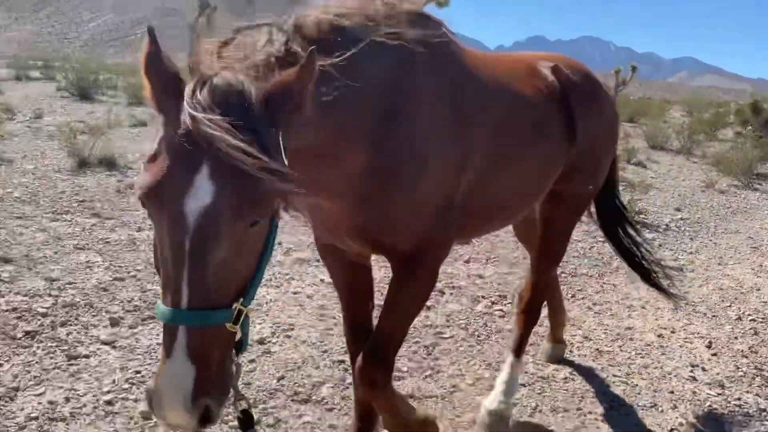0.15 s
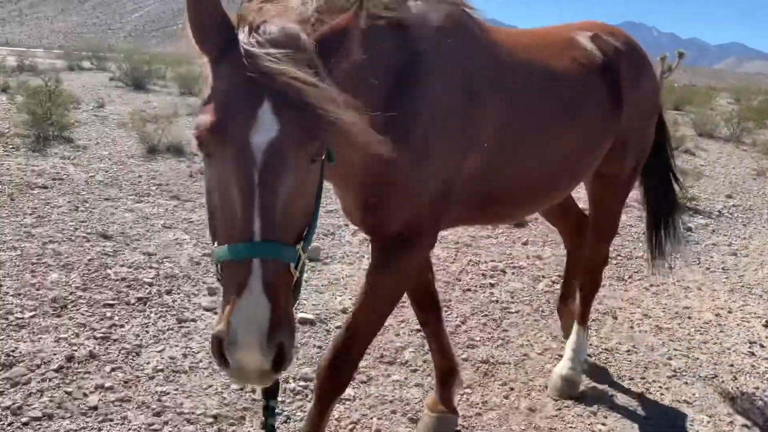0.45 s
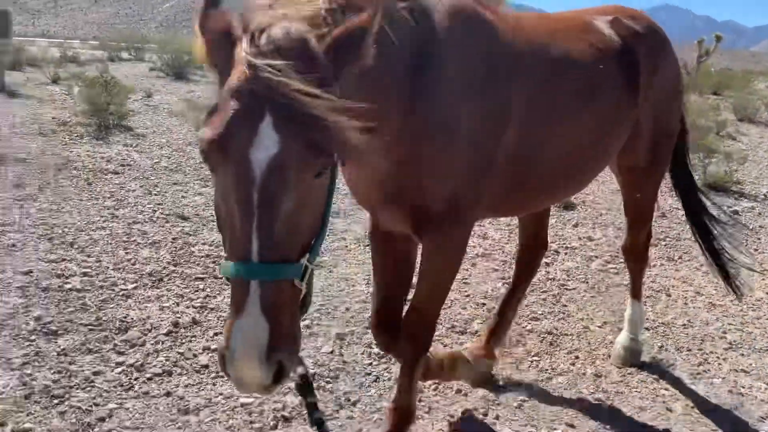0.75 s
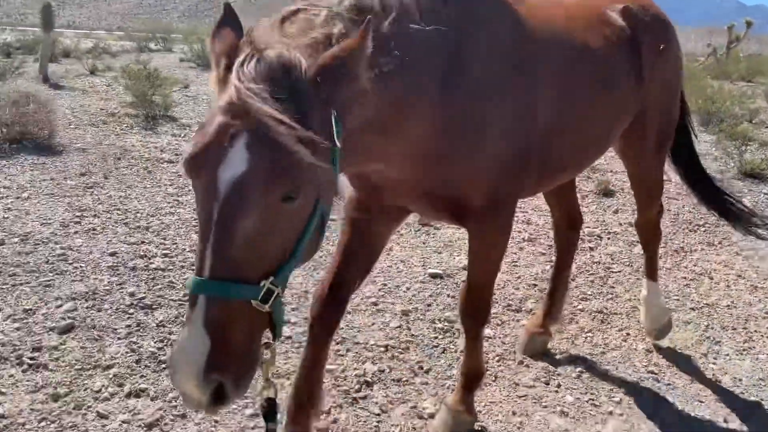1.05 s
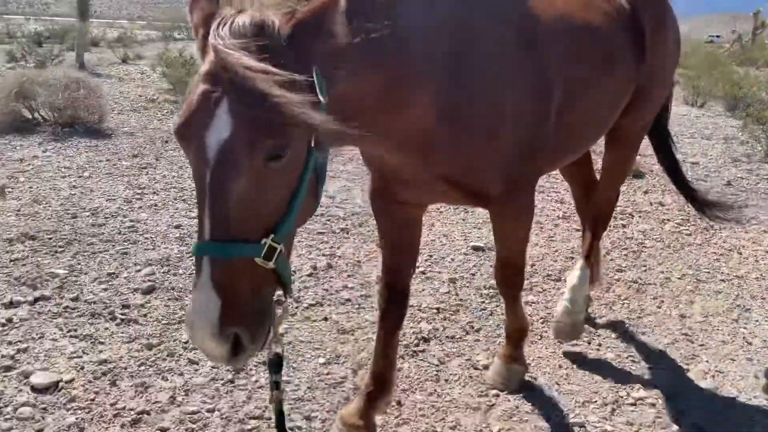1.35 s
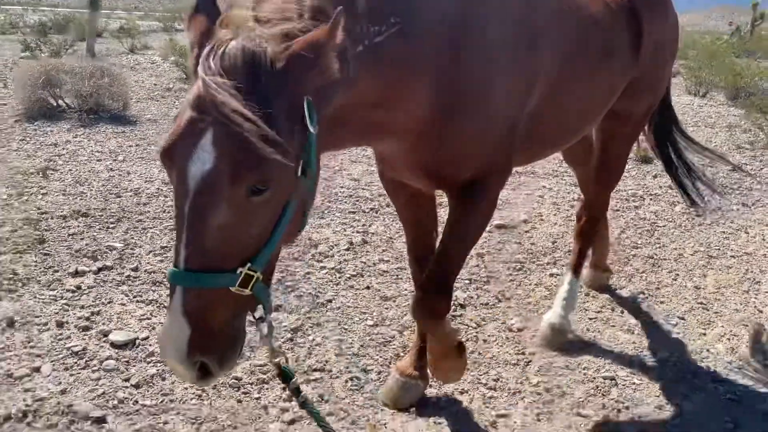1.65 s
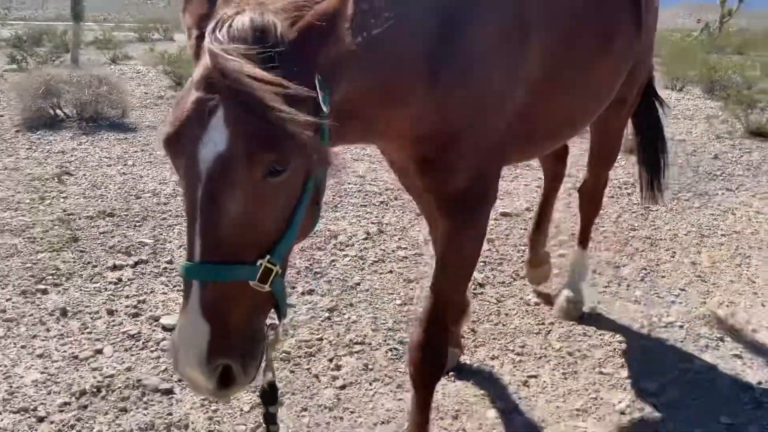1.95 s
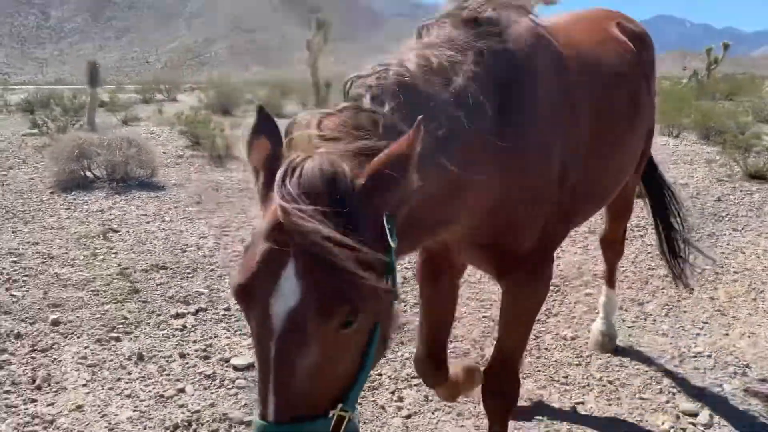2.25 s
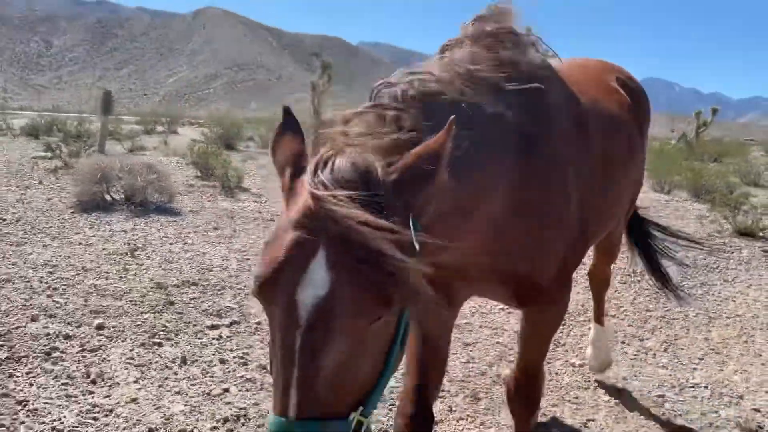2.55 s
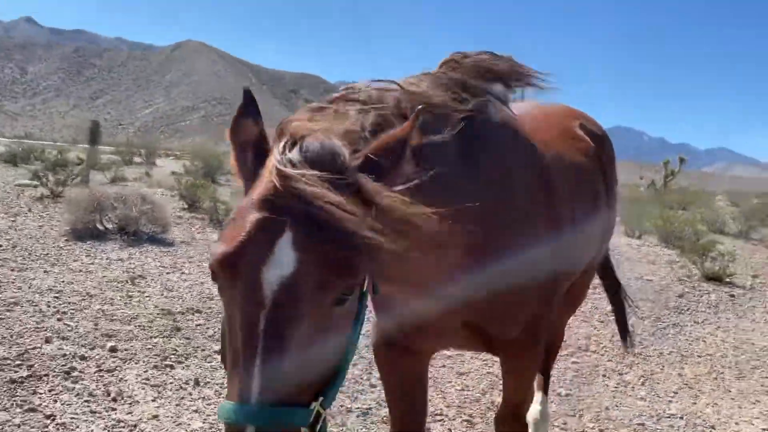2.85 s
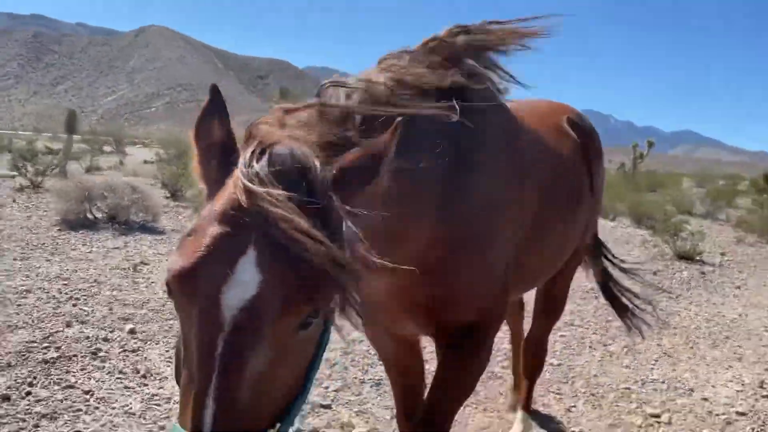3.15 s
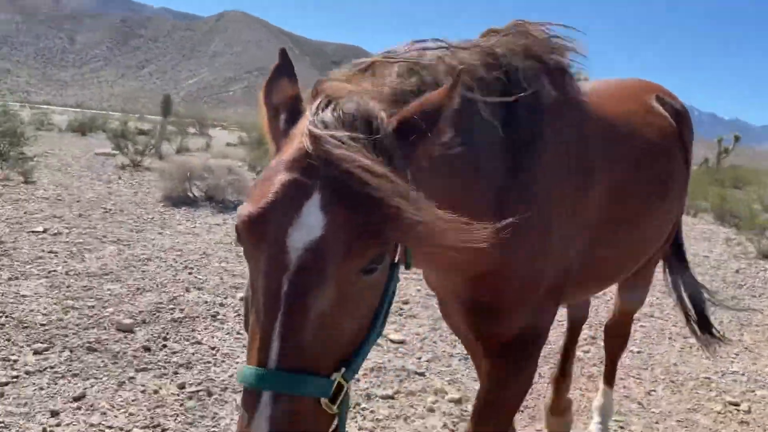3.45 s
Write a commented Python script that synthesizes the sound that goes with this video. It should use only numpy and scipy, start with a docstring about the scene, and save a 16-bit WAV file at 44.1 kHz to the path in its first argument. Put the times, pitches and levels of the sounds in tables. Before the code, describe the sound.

Slow horse steps on dry gravel: short gritty crunches, clearest around 0.4, 0.7, 2.1 and 2.8 seconds, with scattered stone clicks and faint trickling grit between. Small hoof knocks on stone fall near 0.4, 2.7 and 3.4. Loud, low gusty wind rumbles throughout, fluttering and thumping on the close microphone around 0.1, 0.8, 1.5, 2.3 and 3.1, hardest at 3.45. Open, dry outdoors, faint hiss.

```python
"""Gusty wind buffets two microphone ports on a plain while a horse walks over dry gravel.
Wind: banded noise following level curves, plus noise puffs and decaying low sines for hard buffets.
Gravel: random grains ring short resonators for crunches and trickle; stones are damped sines.
A soft band of hiss lies beneath."""
import sys
import numpy as np
from scipy import signal
from scipy.io import wavfile

SR = 44100
rng = np.random.default_rng(int(sys.argv[2]) if len(sys.argv) > 2 else 0)


def pcm_store(signal):
    """Save signal as 16-bit PCM."""
    levels = np.round(np.clip(np.atleast_2d(signal), -1, 1) * 32767)
    wavfile.write(sys.argv[1], SR, levels.astype(np.int16).T)


N = 158760

# Wind rumble curve, used relative to its mean: [t/s, level/dB]
RUMBLE_CURVE = [(0.0, -24.5), (0.06, -19), (0.31, -26.5), (0.36, -19.5), (0.68, -29.5), (0.76, -17),
                (0.91, -33), (0.96, -22), (1.08, -25.5), (1.54, -20.5), (1.88, -24), (1.91, -20.5),
                (2.09, -25), (2.3, -23), (2.34, -28.5), (2.78, -21), (2.8, -13.5), (2.84, -29),
                (3.11, -22.5), (3.19, -30.5), (3.23, -20), (3.4, -20.5), (3.46, -16), (3.6, -26)]
# Upper wind flutter curve, used relative to its mean: [t/s, level/dB]
FLUTTER_CURVE = [(0.0, -62), (0.01, -19.5), (0.09, -56.5), (0.1, -16), (0.18, -65.5), (0.2, -29.5),
                 (0.27, -61), (0.39, -39), (0.64, -43.5), (0.83, -17.5), (0.86, -42.5), (1.02, -39),
                 (1.05, -62.5), (1.33, -23), (1.36, -36.5), (1.57, -19), (1.83, -35.5), (1.97, -20.5),
                 (2.11, -50), (2.17, -23), (2.26, -33.5), (2.27, -12), (2.34, -36), (2.54, -23),
                 (2.61, -48.5), (2.73, -31.5), (2.97, -25), (3.2, -32.5), (3.46, -18.5), (3.6, -13)]
# Wind spectral density, relative: [f/Hz, level/dB per Hz]
WIND_SPECTRUM = [(16, -35), (28, -0.5), (59, 2.5), (108, 2), (329, -5), (558, -14), (858, -30), (946, -30),
                 (1840, -77), (2420, -61)]
# Share of a band's level that follows the flutter, the rest the rumble: [f/Hz, share]
FLUTTER_SHARE = [(150, 0.14), (300, 0.28), (600, 0.64)]
# Depth of the level lumps common to all wind bands: [f/Hz, spread/dB]
LUMP_DEPTH = [(60, 2), (300, 3), (900, 3.5), (2500, 3)]
LUMP_RATE_HZ, OWN_LUMP_DB, OWN_LUMP_RATE_HZ = 33.6, 1.1, 37  # own: separate in each band
WIND_DB, WIND_TOP_HZ = -20.5, 1790
WIND_SIDE_DB, SIDE_CUT_HZ, WIND_PAN_DB = -0.5, 250, 1.3  # pan: left-port gain on the mid wind
# Short turbulent puffs, level before PUFF_DB: [t/s, level/dB]
PUFF_EVENTS = [(0.051, -23), (0.101, -25), (0.769, -26.5), (0.833, -22.5), (1.01, -34.5), (1.287, -22.5),
               (1.516, -26), (1.581, -15.5), (2.008, -45), (2.271, -29.5), (2.711, -24), (2.78, -26.5),
               (2.975, -25), (3.089, -26), (3.225, -27), (3.301, -23.5), (3.345, -19), (3.444, -9.5),
               (3.521, -11)]
# Edges of the puff body band and the brighter band above it: [f/Hz]
PUFF_EDGES_HZ = [440, 713, 1144]
PUFF_RISE_S, PUFF_FALL_S, PUFF_DB, PUFF_BRIGHT_DB = 0.0011, 0.013, -2.5, -9.5
# Hard buffets: [t/s, peak level/dB, f/Hz]
BUFFET_EVENTS = [(0.058, -12, 85), (0.097, -13.5, 113), (0.771, -14, 53.4), (1.519, -10.5, 61.6),
                 (1.971, -17, 52.6), (2.257, -8, 102.6), (2.776, -30, 117), (3.098, -11, 74),
                 (3.445, 0.5, 65)]
BUFFET_T60_S = 0.11

# Steps crunching grit, level one octave off the pitch: [t/s, length/s, level/dB, rel. treble/dB, f/Hz]
CRUNCH_EVENTS = [(0.085, 0.13, -53, -15, 3600), (0.427, 0.016, -41, -27, 3500),
                 (0.444, 0.017, -38.5, -13, 3500), (0.501, 0.05, -54.5, -11, 4000),
                 (0.556, 0.03, -47, -9, 3430), (0.617, 0.02, -47, -25, 2500),
                 (0.662, 0.022, -49, -21, 4500), (0.716, 0.058, -37.5, -13, 4300),
                 (0.9, 0.07, -54, -10, 4530), (1.129, 0.041, -44, -11, 3500),
                 (1.204, 0.035, -50.5, -15, 2300), (1.528, 0.032, -45.5, -14, 3530),
                 (1.778, 0.022, -44.5, -17, 4000), (1.942, 0.066, -44, -13, 4000),
                 (2.083, 0.06, -47, -17, 3520), (2.126, 0.024, -38.5, -30, 3500),
                 (2.269, 0.057, -49.5, -15, 5000), (2.654, 0.022, -44, -14.5, 3470),
                 (2.695, 0.028, -52, -9, 4500), (2.815, 0.061, -41, -21, 3020),
                 (2.876, 0.032, -38.5, -16, 3900), (2.998, 0.045, -46.5, -10, 4000),
                 (3.139, 0.016, -43, -12, 3960), (3.371, 0.053, -49.5, -14, 3400),
                 (3.54, 0.044, -53, -10, 4500)]
CRUNCH_RISE_S, CRUNCH_RELEASE_S, CRUNCH_SAG_DB = 0.0038, 0.0083, 7.5
CRUNCH_FALL_DB_PER_OCT = 3
# Grit trickling between steps, level before TRICKLE_DB: [t/s, level/dB]
TRICKLE_CURVE = [(0.0, -41.5), (0.2, -63.5), (0.43, -55), (0.63, -46.5), (1.16, -53.5), (2.3, -46.5),
                 (2.65, -57), (2.95, -46), (3.35, -54), (3.6, -46)]
TRICKLE_DB, TRICKLE_TREBLE_DB = -8.5, -12.5
# Grit body colour: [f/Hz, level/dB]
GRIT_BODY = [(1100, 3), (1900, -2), (3200, -4), (4500, 0.5), (7000, -1)]
# Grit treble colour: [f/Hz, level/dB]
GRIT_TREBLE = [(8000, -9), (10000, 10), (12000, 3.5), (13800, -9.5), (15500, 6)]
CRUNCH_GRAINS_PER_S, CRUNCH_CLUMP_DB = 21000, 2
TRICKLE_GRAINS_PER_S, TRICKLE_CLUMP_DB = 6600, 2
GRAIN_SPREAD_DB, GRAIN_CYCLES, PATCH_DB = 3.5, 8.1, 2  # cycles to -60 dB; patch: level drift per resonance
# second draw of the same crunches and trickle, opposite in sign at the two ports, widening the grit
GRIT_WIDTH_DB = -7.5

# Single stone clicks, before STONE_DB and CRACK_DB: [t/s, level/dB, rel. treble/dB, f/Hz]
CLICK_EVENTS = [(0.0967, -36, -14, 2980), (0.1386, -43.5, -8, 3000), (0.4228, -41, -26, 4500),
                (0.815, -41, -7.5, 5500), (0.8433, -28.5, -24, 4630), (0.9074, -37, -18, 4540),
                (0.9225, -35, -8, 1660), (0.9548, -32, -17, 1410), (1.0452, -33, -34, 1850),
                (1.1402, -28.5, -17, 2460), (1.3461, -30, -19, 5300), (1.3766, -31.5, -37, 2150),
                (1.394, -34.5, -25, 4600), (1.411, -38.5, -37, 2010), (1.4463, -28, -23, 1500),
                (1.7806, -36, -19, 2500), (1.9772, -25.5, -22, 5030), (2.0252, -37.5, -25, 5500),
                (2.086, -40, -21, 3000), (2.1034, -26.5, -35, 3640), (2.1315, -25.5, -56, 3600),
                (2.2803, -38.5, -30, 4900), (2.3249, -22, -21, 3780), (2.4653, -43, -11, 4000),
                (2.5538, -37, -45, 1700), (2.6574, -22, -30, 2350), (2.816, -26.5, -30, 3800),
                (2.8919, -25.5, -26, 3970), (2.9485, -28.5, -37, 2250), (3.025, -40, -38, 3000),
                (3.1273, -34, -28, 2760), (3.394, -26.5, -29, 3340)]
# Range spanned by the stone modes: [f/Hz]
STONE_SPAN_HZ = [1100, 7000]
STONE_CYCLES, STONE_DB, STONE_FALL_DB_PER_OCT = 9.6, 4.5, 12  # cycles to -60 dB
CRACK_DB, CRACK_DECAY_S, CRACK_LOW_CUT_HZ = 13, 0.0013, 7060
# Hoof knocks on a larger stone: [t/s, peak level/dB, f/Hz, t60/s]
KNOCK_EVENTS = [(0.436, -22, 1780, 0.0078), (2.656, -21, 1088, 0.031), (3.4373, -20.5, 1460, 0.0075)]

# Left-port cavity, phase only: [f/Hz, width/Hz]
LEFT_CAVITY = [(8600, 2600), (14000, 2500)]
GRAVEL_PAN_DB, PAN_TOP_HZ = 3, 6500
ECHO_DB, ECHO_DELAYS_S = -17, [0.0041, 0.0045]  # delays: left, right

HISS_DB, HISS_BAND_HZ = -60.5, [740, 2630]

# Edge below which both channels are alike: [t/s, f/Hz]
MONO_EDGE = [(0, 430), (1.7, 400), (2.1, 300), (2.5, 220), (2.9, 160), (3.6, 110)]
BASS_CUT_HZ, TOP_SHELF_HZ, TOP_SHELF_DB, TOP_STOP_HZ = 40, 13700, -6, 16000


def from_db(db):
    """Decibels to gain."""
    return 10 ** (np.asarray(db) / 20)


def rms_one(x):
    """Scale to rms 1."""
    return x / np.sqrt(np.mean(x ** 2) + 1e-20)


def level_curve(rows):
    """Level/dB at every sample."""
    t, db = np.transpose(rows)
    return np.interp(np.arange(N) / SR, t, db)


def at_hz(rows, hz):
    """Read a table on a log-frequency axis."""
    f, value = np.transpose(rows)
    return np.interp(np.log(hz), np.log(f), value)


def butter(order, hz, kind="low"):
    """Butterworth sections."""
    return signal.butter(order, hz, kind, fs=SR, output="sos")


def drift(rate_hz):
    """Low-passed noise of spread 1, made at every 20th sample and interpolated."""
    r = np.exp(-2 * np.pi * rate_hz * 20 / SR)
    noise = rng.standard_normal(N // 20 + 1002)
    slow = signal.lfilter([1], [1, -2 * r, r * r], noise)[1000:]  # settled part
    return np.interp(np.arange(N) / 20, np.arange(len(slow)), rms_one(slow))


def ring(impulses, hz, t60_s):
    """Two-pole resonator: a unit impulse starts a decaying sine of height 1."""
    r, w = from_db(-60 / (t60_s * SR)), 2 * np.pi * hz / SR
    return signal.lfilter([0, np.sin(w)], [1, -2 * r * np.cos(w), r * r], impulses + 1e-18)


def damped_sine(hz, t60_s):
    """Free decay of one mode, down to -60 dB."""
    t = np.arange(int(t60_s * SR)) / SR
    return np.sin(2 * np.pi * hz * t) * from_db(-60 * t / t60_s)


def add(out, t_s, sound):
    """Mix a short sound in at a time."""
    i = int(t_s * SR)
    out[i:i + len(sound)] += sound[:N - i]


def wind_noise():
    """Turbulence as third-octave noise bands: low bands follow the rumble, upper ones the flutter."""
    rumble_db, flutter_db = level_curve(RUMBLE_CURVE), level_curve(FLUTTER_CURVE)
    rumble_db = rumble_db - rumble_db.mean()
    flutter_db = flutter_db - flutter_db.mean()
    edges_hz = 25 * 2 ** np.arange(0, 7.1, 1 / 3)
    lumps = drift(LUMP_RATE_HZ)
    # neighbouring bands take different noise; each noise has mid and side rows
    white = rng.standard_normal((2, 2, N + SR // 4))
    out = np.zeros((2, N))
    for k, (low, high) in enumerate(zip(edges_hz, edges_hz[1:])):
        band = signal.sosfilt(butter(2, [low, high], "band"), white[k % 2])[:, -N:]
        hz = np.sqrt(low * high)
        share = at_hz(FLUTTER_SHARE, hz)
        level_db = at_hz(WIND_SPECTRUM, hz) + share * flutter_db + (1 - share) * rumble_db
        lump_db = at_hz(LUMP_DEPTH, hz) * lumps + OWN_LUMP_DB * drift(OWN_LUMP_RATE_HZ)
        out += band * from_db(level_db + lump_db)
    out = signal.sosfilt(butter(4, WIND_TOP_HZ), out)
    return from_db(WIND_DB) * out / np.sqrt(np.mean(out[0] ** 2))


def puffs():
    """Short turbulent bursts: fast-rising, decaying noise in a body band and a brighter band."""
    t = np.arange(int(.08 * SR)) / SR
    shape = np.minimum(t / PUFF_RISE_S, 1) * np.exp(-t / PUFF_FALL_S)
    envelope = np.zeros(N)
    for t_s, db in PUFF_EVENTS:
        add(envelope, t_s, from_db(db + PUFF_DB) * shape)
    low, middle, high = PUFF_EDGES_HZ
    body, bright = [rms_one(signal.sosfilt(butter(2, edges, "band"), rng.standard_normal((2, N))))
                    for edges in ([low, middle], [middle, high])]
    return envelope * (body + from_db(PUFF_BRIGHT_DB) * bright)


def buffets():
    """Hard gust blows as decaying low sines."""
    out = np.zeros(N)
    for t_s, db, hz in BUFFET_EVENTS:
        add(out, t_s, from_db(db) * damped_sine(hz, BUFFET_T60_S))
    return out


def wind():
    """Noise and puffs as mid and bass-cut side, leaning left; buffets equal at both ports."""
    mid, side = wind_noise() + puffs()
    side = from_db(WIND_SIDE_DB) * signal.sosfilt(butter(1, SIDE_CUT_HZ, "high"), side)
    side = side + mid * (from_db(WIND_PAN_DB) - 1)
    mid = mid + buffets()
    return np.array([mid + side, mid - side])


def grains(per_s, clump_db):
    """Random grit contacts ring short resonances; gives body pitches, their rings and summed treble."""
    size_db = GRAIN_SPREAD_DB * np.minimum(rng.exponential(1, N), 4)
    sizes = from_db(size_db) * rng.choice([-1, 1], N)
    contacts = sizes * (rng.random(N) < per_s / SR) * from_db(clump_db * drift(94))
    dealt = rng.integers(0, 8, N)  # each contact excites one of 8 resonances

    def rings(colour):
        """Coloured resonances, rms 1 in sum."""
        pitches_hz = np.geomspace(colour[0][0], colour[-1][0], 8)
        parts = []
        for k, hz in enumerate(pitches_hz):
            gain = from_db(at_hz(colour, hz) + PATCH_DB * drift(49))
            parts.append(gain * ring(contacts * (dealt == k), hz, GRAIN_CYCLES / hz))
        parts = np.array(parts)
        return pitches_hz, parts / np.std(parts.sum(axis=0))

    pitches_hz, body = rings(GRIT_BODY)
    treble = rings(GRIT_TREBLE)[1].sum(axis=0)
    return pitches_hz, body, treble


def crunches():
    """Steps load dense grains: quick rise, sagging hold, short release, body strongest near each pitch."""
    t = np.arange(N) / SR
    start_s, length_s, db, treble_db, pitch_hz = np.transpose(CRUNCH_EVENTS)
    heights = [0, 1, from_db(-CRUNCH_SAG_DB), 0]
    shapes = np.array([np.interp(t, a + np.array([0, CRUNCH_RISE_S, b, b + CRUNCH_RELEASE_S]), heights)
                       for a, b in zip(start_s, length_s)])
    pitches_hz, body, treble = grains(CRUNCH_GRAINS_PER_S, CRUNCH_CLUMP_DB)
    octaves = abs(np.log2(pitches_hz[:, None] / pitch_hz))
    body_gain = from_db(db - CRUNCH_FALL_DB_PER_OCT * (octaves - 1)) @ shapes
    treble_gain = from_db(db + treble_db) @ shapes
    return np.sum(body_gain * body, axis=0) + treble_gain * treble


def trickle():
    """Sparser grains run on between the steps along a level curve."""
    _, body, treble = grains(TRICKLE_GRAINS_PER_S, TRICKLE_CLUMP_DB)
    gain = from_db(level_curve(TRICKLE_CURVE) + TRICKLE_DB)
    return gain * (body.sum(axis=0) + from_db(TRICKLE_TREBLE_DB) * treble)


def stone_clicks():
    """Each click excites ten damped modes, hardest near its pitch, plus a bright noise crack."""
    out, cracks = np.zeros(N), np.zeros(N)
    crack_shape = np.exp(-np.arange(256) / SR / CRACK_DECAY_S)
    modes_hz = np.geomspace(*STONE_SPAN_HZ, 10)
    for t_s, db, treble_db, pitch_hz in CLICK_EVENTS:
        noise = rng.standard_normal(256)
        add(cracks, t_s, from_db(db + treble_db + CRACK_DB) * noise * crack_shape)
        for k, hz in enumerate(modes_hz):
            fall_db = STONE_FALL_DB_PER_OCT * abs(np.log2(hz / pitch_hz))
            strength = from_db(db + STONE_DB - fall_db + 2 * rng.standard_normal()) * (-1) ** k
            detuned_hz = hz * (1 + .05 * rng.standard_normal())
            add(out, t_s, strength * damped_sine(detuned_hz, STONE_CYCLES / hz))
    return out + signal.sosfilt(butter(4, CRACK_LOW_CUT_HZ, "high"), cracks)


def hoof_knocks():
    """A hoof sets one damped mode of a larger stone ringing."""
    out = np.zeros(N)
    for t_s, db, hz, t60_s in KNOCK_EVENTS:
        add(out, t_s, from_db(db) * damped_sine(hz, t60_s))
    return out


def to_ports(x):
    """Ground echo per port; left all-passed by its cavity and louder below the treble."""
    left, right = [x + from_db(ECHO_DB) * np.r_[np.zeros(int(s * SR)), x][:N] for s in ECHO_DELAYS_S]
    for hz, width_hz in LEFT_CAVITY:
        r = np.exp(-np.pi * width_hz / SR)
        a = [1, -2 * r * np.cos(2 * np.pi * hz / SR), r * r]
        left = signal.lfilter(a[::-1], a, left)
    left = left + (from_db(GRAVEL_PAN_DB) - 1) * signal.sosfiltfilt(butter(2, PAN_TOP_HZ), left)
    return np.array([left, right])


def hiss():
    """Soft band of air noise over the plain, slightly wavering, partly shared by the ports."""
    noise = signal.sosfilt(butter(4, HISS_BAND_HZ, "band"), rng.standard_normal((3, N)))
    return from_db(HISS_DB + 1.1 * drift(16)) * rms_one(noise[0] + 2.1 * noise[1:])


def scene():
    """Wind, gravel steps, widened grit and hiss at the two ports."""
    gravel = to_ports(crunches() + trickle() + stone_clicks() + hoof_knocks())
    grit_width = from_db(GRIT_WIDTH_DB) * (crunches() + trickle()) * [[1], [-1]]
    return wind() + gravel + grit_width + hiss()


def mono_bass(x):
    """Cut the side signal below a sinking edge, crossfading one steep filter per table row."""
    mid, side = (x[0] + x[1]) / 2, (x[0] - x[1]) / 2
    times_s = [t_s for t_s, _ in MONO_EDGE]
    kept = np.zeros(N)
    for k, (_, hz) in enumerate(MONO_EDGE):
        fade = np.interp(np.arange(N) / SR, times_s, np.arange(len(times_s)) == k)
        kept += fade * signal.sosfiltfilt(butter(8, hz, "high"), side)
    return np.array([mid + kept, mid - kept])


def record(dry):
    """Deep bass rolled off, top shelved, peaks rounded, bass made mono, top cut."""
    x = signal.sosfilt(butter(4, BASS_CUT_HZ, "high"), dry)
    x = x + (from_db(TOP_SHELF_DB) - 1) * signal.sosfiltfilt(butter(8, TOP_SHELF_HZ, "high"), x)
    rounded = .97 * np.tanh(x / .97)
    top_cut = signal.cheby2(12, 60, TOP_STOP_HZ, fs=SR, output="sos")
    return signal.sosfilt(top_cut, mono_bass(rounded))


dry = scene()
out = record(dry)
pcm_store(out)
```